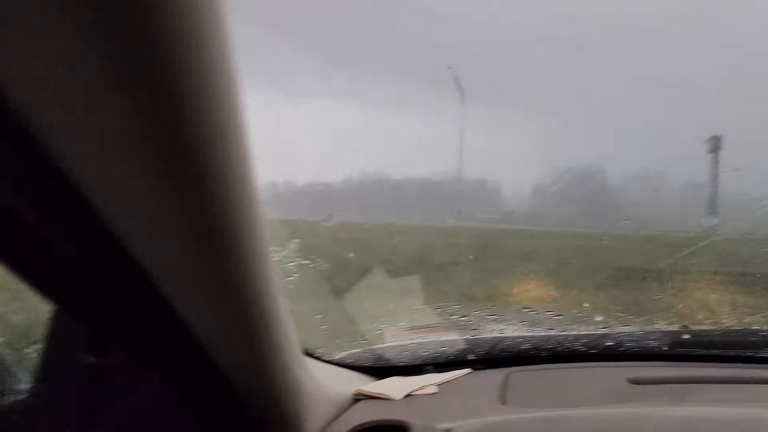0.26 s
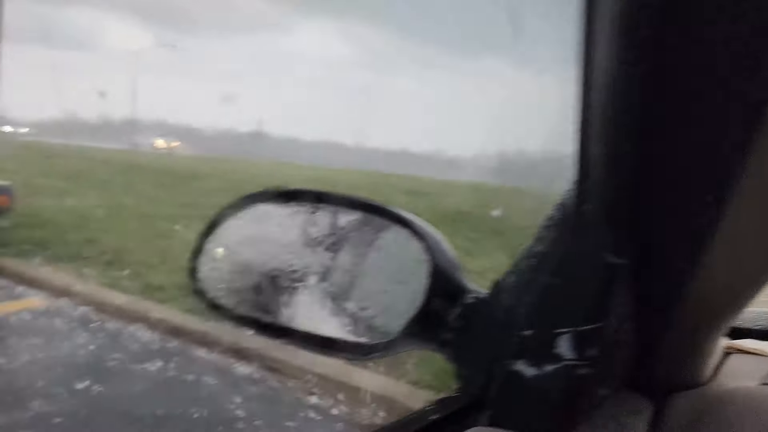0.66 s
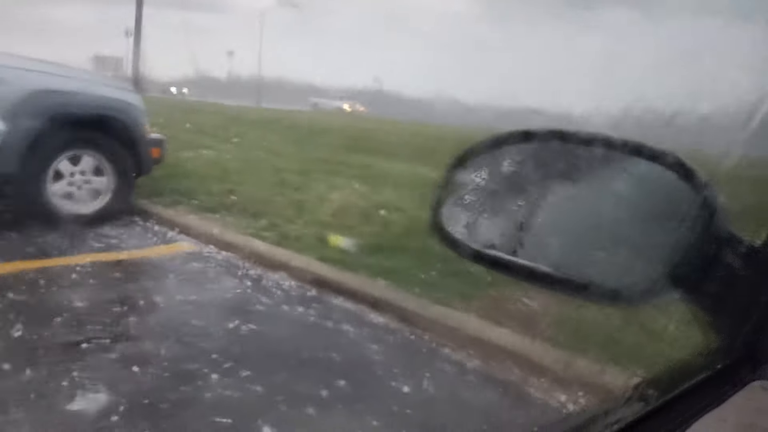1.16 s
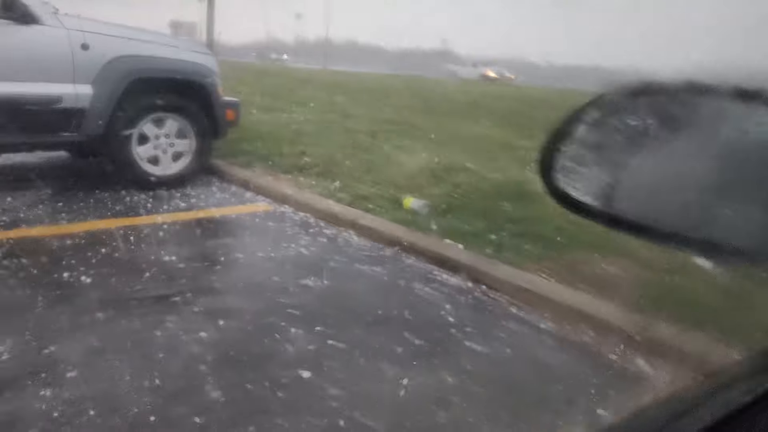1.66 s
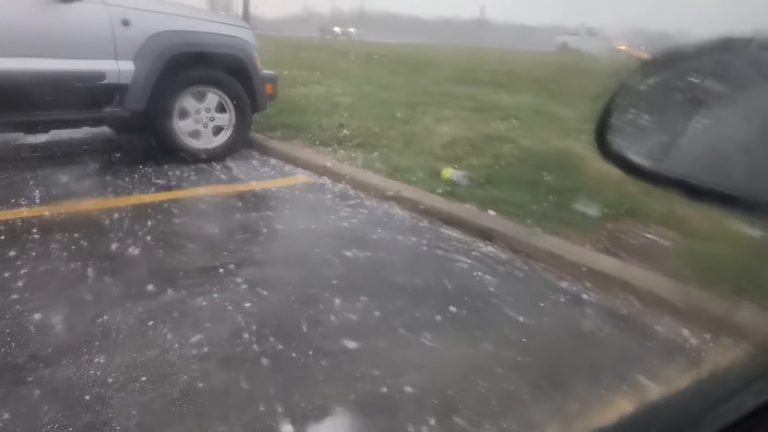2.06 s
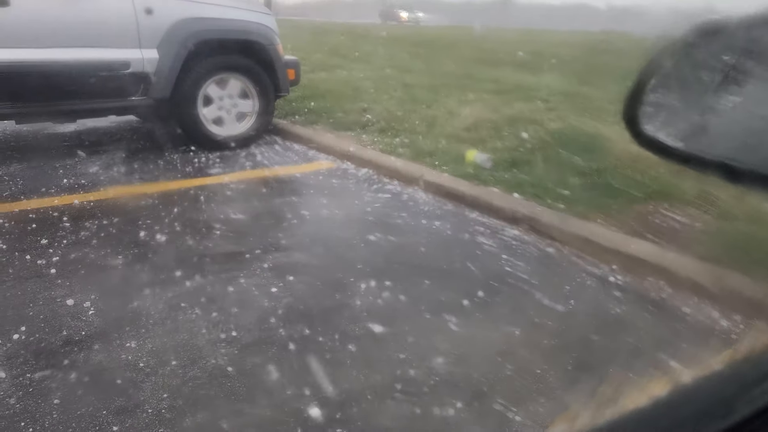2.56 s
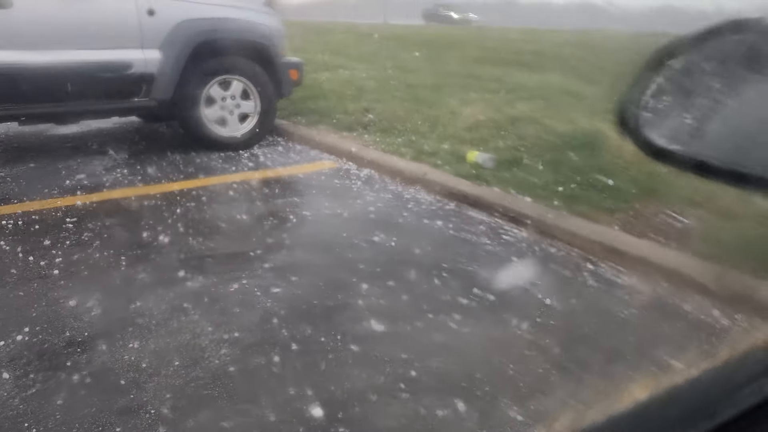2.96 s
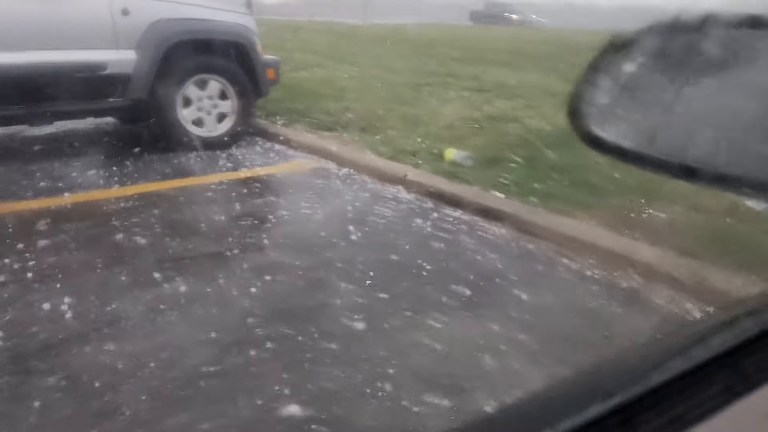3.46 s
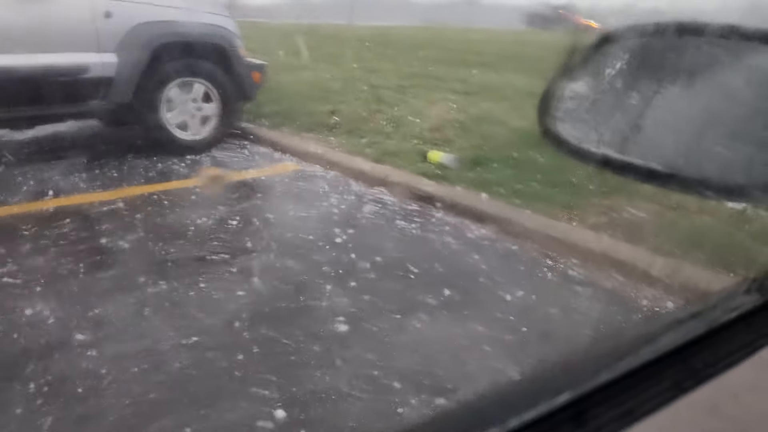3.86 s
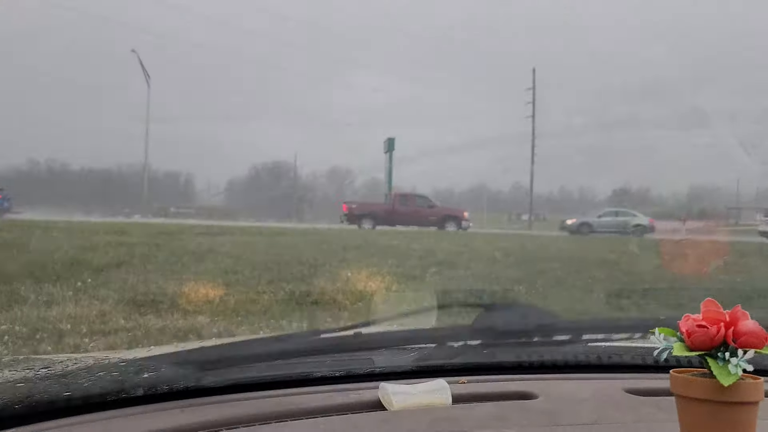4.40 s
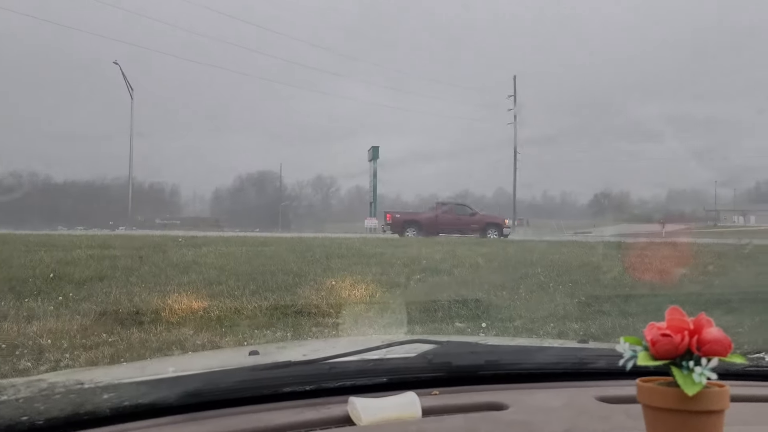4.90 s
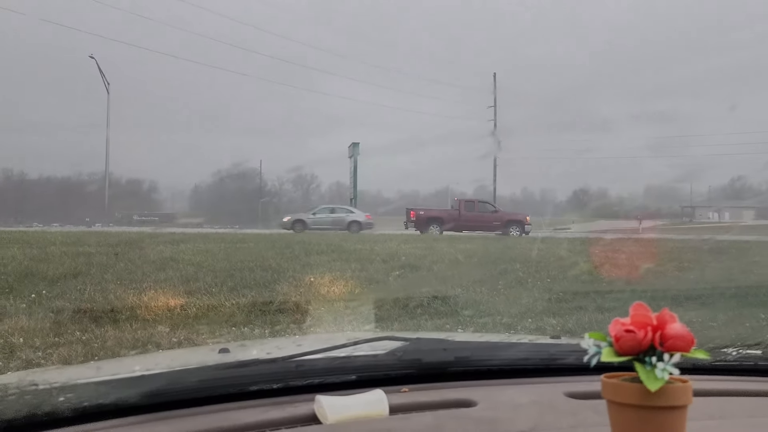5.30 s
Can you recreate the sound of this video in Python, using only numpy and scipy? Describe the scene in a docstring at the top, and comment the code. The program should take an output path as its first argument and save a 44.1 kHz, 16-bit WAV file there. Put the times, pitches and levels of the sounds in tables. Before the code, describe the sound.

Irregular, crowded hail blows on a car body, close and enclosed in the cabin. Each is a short dull thump or tinny knock with crackling ice, some with a deep boom. Hard pounding, a short lull after three seconds, more pounding, an abrupt silent gap past four, another hard burst, then lighter taps over quiet rain and rumble, in dry phone stereo.

```python
"""Hailstones strike the roof, glass and bonnet of a parked car, heard by a stereo phone in the cabin.
Each stone rings the body panels as damped modes, the deepest swelling late, and cracks as noise bursts
of shattering ice; small stones, rain patter and rumble run underneath. Blows fall hard up to 2.9 s,
mostly weaker until 3.3 s, then hard again; the sound is cut to silence at 4.33 s and is back at 4.52 s,
with weaker blows again after 5.06 s."""
import sys
import numpy as np
from scipy import signal
from scipy.fft import rfft, irfft, next_fast_len
from scipy.io import wavfile
from scipy.ndimage import uniform_filter1d

SR = 44100
rng = np.random.default_rng(int(sys.argv[2]) if len(sys.argv) > 2 else 0)


def materialize(psi):
    """Save the field psi as 16-bit PCM at rate SR to the path in sys.argv[1].

    A 1-D psi becomes a single channel; in a 2-D psi each row is a channel.
    """
    bounded = np.clip(np.atleast_2d(psi).T, -1, 1)
    quanta = np.round(bounded * 32767).astype(np.int16)
    wavfile.write(sys.argv[1], SR, quanta)


N = 244314

# stones heard one by one; levels after the blow are relative to it, all before the layer trims:
# (time [s], blow [dB], drum [Hz], drum [dB], knock [Hz], knock [dB], rap [dB], dull crack [dB],
#  bright crack [dB], ring length [1 = usual])
LARGE_STONES = [(0.058, -20, 150, -1, 592, -8, -21, -15, -28, 0.5),
                (0.089, -26, 193, -2, 559, -15, -12, -9, -9, 0.4),
                (0.124, -43, 263, 0, 511, -12, -15, -15, -13, 1.1),
                (0.175, -11, 199, -4, 532, -6, -7, -25, -18, 0.85),
                (0.258, -29, 188, -6, 1464, -8, -4, -7, -12, 0.9),
                (0.28, -19, 199, -1, 1222, -7, -22, -33, -26, 0.9),
                (0.306, -21, 226, -8, 1200, -1, -10, -21, -17, 0.7),
                (0.344, -30, 150, -1, 473, -7, -22, -35, -23, 1.3),
                (0.398, -23, 425, -3, 861, -5, -12, -15, -21, 0.9),
                (0.426, -21, 172, -3, 473, -15, -8, -7, -12, 1.0),
                (0.51, -24, 150, -5, 672, -3, -16, -15, -18, 0.7),
                (0.558, -27, 409, -1, 500, -12, -31, -45, -45, 1.7),
                (0.614, -21, 340, -3, 484, -5, -21, -14, -14, 1.3),
                (0.714, -29, 188, 0, 473, -15, -28, -29, -26, 1.0),
                (0.811, -18, 236, -9, 554, -14, -9, -2, -8, 1.3),
                (0.851, -13, 161, -7, 581, -11, -6, -5, -11, 0.4),
                (0.903, -20, 166, -4, 1485, -7, -5, -13, -12, 0.9),
                (0.991, -10, 382, -6, 520, -2, -7, -28, -24, 0.9),
                (1.071, -10, 188, -3, 1152, -4, -13, -21, -18, 0.6),
                (1.125, -21, 339, -11, 629, -4, -5, -17, -9, 1.2),
                (1.222, -30, 177, -3, 473, -14, -14, -7, -6, 0.7),
                (1.279, -25, 247, -1, 527, -6, -13, -15, -13, 0.8),
                (1.321, -11, 188, -1, 624, -8, -21, -33, -30, 0.7),
                (1.368, -12, 215, -6, 608, -3, -10, -11, -22, 0.9),
                (1.39, -20, 177, -9, 484, -12, -15, -7, -3, 0.6),
                (1.426, -22, 199, -9, 1388, -5, -3, -19, -12, 0.9),
                (1.485, -20, 166, -10, 608, -6, -9, -13, -5, 1.0),
                (1.576, -12, 215, -2, 473, -7, -13, -22, -22, 0.9),
                (1.599, -18, 215, -1, 473, -11, -17, -13, -17, 0.9),
                (1.637, -29, 258, -3, 559, -15, -6, -17, -10, 0.9),
                (1.664, -25, 226, -5, 570, -2, -10, -15, -12, 0.9),
                (1.711, -24, 188, -4, 473, -4, -17, -13, -15, 0.9),
                (1.726, -23, 193, -2, 527, -7, -15, -28, -33, 0.6),
                (1.782, -32, 172, 0, 522, -13, -17, -20, -18, 1.3),
                (1.821, -32, 279, -6, 489, -1, -23, -29, -31, 0.9),
                (1.888, -12, 161, -6, 506, -7, -10, -4, -11, 0.7),
                (1.918, -17, 371, -6, 1496, -3, -8, -17, -17, 0.8),
                (1.99, -25, 446, -6, 678, -2, -8, -22, -20, 1.3),
                (2.024, -17, 441, -7, 602, -1, -25, -16, -28, 0.4),
                (2.064, -27, 226, -6, 543, -10, -7, -6, -6, 1.3),
                (2.096, -9, 349, -2, 1189, -6, -11, -17, -18, 0.6),
                (2.143, -14, 366, -9, 726, -6, -8, -8, -4, 0.9),
                (2.167, -15, 199, -2, 549, -6, -20, -27, -14, 0.9),
                (2.211, -28, 247, -2, 516, -6, -13, -16, -12, 1.0),
                (2.275, -12, 177, -5, 753, -11, -5, -10, -5, 0.9),
                (2.297, -18, 150, -5, 570, -7, -11, -6, -12, 0.6),
                (2.33, -17, 285, -6, 543, -4, -15, -8, -7, 1.3),
                (2.372, -22, 322, -2, 473, -5, -13, -20, -14, 1.3),
                (2.403, -16, 312, -14, 570, -2, -9, -15, -14, 0.4),
                (2.569, -12, 193, -2, 1000, -8, -10, -12, -11, 0.9),
                (2.581, -14, 188, -12, 538, -1, -14, -24, -29, 0.9),
                (2.604, -23, 349, -4, 543, -3, -18, -28, -14, 0.8),
                (2.661, -18, 188, -1, 586, -15, -10, -19, -17, 0.6),
                (2.702, -29, 150, -2, 651, -7, -13, -18, -13, 0.9),
                (2.715, -24, 371, -2, 506, -6, -12, -15, -21, 0.9),
                (2.739, -10, 253, -2, 737, -6, -17, -14, -15, 0.7),
                (2.812, -15, 441, -8, 473, -10, -7, -7, -4, 0.5),
                (2.844, -30, 150, -2, 1291, -9, -8, -18, -14, 0.8),
                (2.904, -31, 231, 0, 473, -19, -14, -20, -20, 0.9),
                (2.918, -37, 183, -8, 473, -3, -16, -5, -31, 0.5),
                (2.955, -43, 177, 0, 656, -15, -24, -22, -18, 0.9),
                (2.976, -37, 156, -4, 473, -4, -13, -10, -11, 1.0),
                (3.041, -36, 285, -5, 645, -7, -12, -15, -3, 0.6),
                (3.08, -22, 150, -5, 565, -12, -13, -11, -4, 0.4),
                (3.12, -31, 242, -4, 1227, -7, -5, -16, -19, 1.3),
                (3.149, -31, 236, -4, 522, -6, -8, -11, -11, 0.9),
                (3.215, -40, 150, -4, 1496, -15, -3, -13, -14, 0.9),
                (3.233, -39, 150, -11, 506, -2, -5, -15, -24, 0.9),
                (3.287, -36, 199, -8, 473, -4, -17, -5, -8, 0.7),
                (3.323, -24, 177, -8, 565, -8, -7, -5, -9, 0.7),
                (3.361, -18, 209, -1, 1211, -8, -18, -18, -17, 0.9),
                (3.444, -36, 242, 0, 1254, -19, -20, -18, -19, 0.9),
                (3.468, -21, 150, -8, 613, -7, -9, -5, -9, 0.9),
                (3.484, -19, 360, -4, 511, -5, -14, -5, -12, 0.9),
                (3.512, -33, 414, -5, 554, -6, -13, -4, -16, 1.0),
                (3.558, -40, 199, -3, 581, -13, -15, -14, -5, 0.9),
                (3.583, -18, 150, -4, 608, -3, -19, -19, -37, 0.4),
                (3.617, -13, 290, -19, 1248, -9, -6, -1, -26, 0.4),
                (3.655, -18, 183, -6, 1114, -8, -6, -7, -12, 0.9),
                (3.67, -19, 215, -8, 893, -4, -8, -7, -8, 1.3),
                (3.775, -24, 296, -6, 522, -2, -16, -21, -18, 1.3),
                (3.83, -18, 150, -16, 570, -7, -12, -3, -9, 0.5),
                (3.895, -31, 231, -1, 662, -8, -13, -18, -16, 0.9),
                (3.912, -14, 172, -7, 1378, -15, -10, -6, -4, 0.6),
                (4.002, -22, 161, -4, 586, -4, -14, -7, -15, 0.9),
                (4.028, -16, 166, -5, 1087, -7, -9, -10, -8, 1.1),
                (4.075, -19, 183, -6, 678, -10, -12, -2, -11, 0.6),
                (4.105, -30, 204, -2, 506, -5, -25, -33, -43, 0.7),
                (4.214, -24, 188, -4, 516, -4, -7, -20, -27, 1.0),
                (4.295, -32, 183, 0, 538, -11, -30, -29, -31, 1.3),
                (4.331, -30, 446, -13, 635, -3, -10, -6, -9, 0.4),
                (4.565, -11, 150, -11, 1114, -5, -8, -4, -14, 0.5),
                (4.635, -27, 312, -7, 1308, -2, -9, -21, -29, 1.3),
                (4.668, -9, 414, -7, 900, -6, -5, -15, -16, 0.8),
                (4.713, -24, 296, -6, 473, -4, -8, -11, -20, 0.8),
                (4.803, -11, 177, -6, 586, -5, -9, -13, -17, 0.8),
                (4.847, -28, 166, -2, 543, -10, -14, -7, -7, 1.1),
                (4.909, -33, 430, -6, 769, -2, -10, -26, -20, 1.3),
                (4.945, -23, 333, -6, 629, -8, -5, -7, -10, 1.5),
                (4.973, -21, 446, -16, 597, -1, -10, -11, -13, 1.1),
                (5.01, -12, 269, -10, 1388, -9, -11, -4, -13, 1.0),
                (5.062, -30, 290, -11, 1248, -6, -3, -16, -9, 0.9),
                (5.099, -41, 236, -10, 947, -8, -3, -6, -11, 1.1),
                (5.144, -43, 188, -5, 1469, -3, -8, -23, -24, 1.3),
                (5.203, -36, 425, -12, 1496, -2, -7, -27, -40, 1.1),
                (5.255, -30, 188, -4, 629, -6, -13, -7, -26, 1.3),
                (5.284, -36, 193, 0, 489, -13, -16, -21, -17, 1.3),
                (5.376, -35, 166, -14, 1318, -1, -9, -24, -47, 1.1),
                (5.452, -37, 150, -3, 855, -5, -10, -19, -26, 1.3),
                (5.523, -40, 150, -14, 554, -1, -7, -20, -30, 0.9)]
# storm strength before the layer trims; hail density moves patter and small stones together:
# (time [s], rumble [dB], hail density [dB])
STORM_LEVELS = [(0, -38, -41), (.3, -30, -38), (.7, -33, -41), (1, -34, -37), (1.23, -36, -43),
                (1.5, -35, -36), (1.85, -34, -39), (2.2, -30, -35), (2.5, -35, -41), (2.8, -31, -38),
                (3.1, -36, -42), (3.5, -32, -39), (4.2, -28, -39), (4.55, -34, -33), (5.15, -34, -40),
                (5.54, -31, -40)]


def undb(db):
    """Amplitude ratio of a level in dB."""
    return 10 ** (np.asarray(db) / 20)


def unit(x):
    """Scale to rms 1."""
    return x / np.sqrt(np.mean(x ** 2))


def over_hz(table, hz):
    """Read a (Hz, value) table on a log axis."""
    table_hz, value = np.transpose(table)
    return np.interp(np.log(hz + 1), np.log(table_hz), value)


def pair(hz, a, b):
    """Left and right from two unrelated draws, as alike and as balanced as the two microphones at this pitch."""
    # (frequency [Hz], left-right correlation [-1..1])
    likeness = [(60, .996), (130, .992), (290, .91), (640, .3), (1200, -.05), (3000, .02)]
    # (frequency [Hz], left minus right [dB])
    balance = [(60, .2), (130, .6), (250, 2), (500, 3.5), (2000, 1.2), (8000, 3.2), (14000, 1.5)]
    correlation = np.clip(over_hz(likeness, hz), -1, 1)
    lean = undb(over_hz(balance, hz) / 2)
    common = np.sqrt(1 + correlation) * a
    opposed = np.sqrt(1 - correlation) * b
    return np.array([lean * (common + opposed), (common - opposed) / lean]) / np.sqrt(2)


def hiss(gain):
    """Stereo noise coloured by gain(Hz), rms 1."""
    size = next_fast_len(N + 1, True)
    hz = np.fft.rfftfreq(size, 1 / SR)
    a, b = rfft(rng.standard_normal((2, size)))
    return unit(irfft(pair(hz, a, b) * gain(hz), size)[:, :N])


def walk(rate_hz):
    """Random levels held 1 / rate_hz s and slewed."""
    hold = int(SR / rate_hz)
    steps = np.repeat(rng.standard_normal(N // hold + 1), hold)
    return uniform_filter1d(steps, hold)[:N]


def hail(s, blow_db, drum_hz, drum, knock_hz, knock, rap, dull, bright, ring):
    """Panels ring and ice breaks for every stone."""
    # stones that shake the cabin into a deep boom, before the mode trims: (time [s], boom [dB])
    booms = [(.058, -26), (.307, -31), (.425, -32), (.572, -33), (.715, -32), (1.889, -34), (2.144, -31),
             (2.167, -28), (2.276, -23), (2.331, -30), (2.703, -29), (2.812, -19), (3.081, -33),
             (3.469, -31), (3.583, -26), (3.776, -31), (3.831, -25), (3.913, -29), (4.077, -29),
             (4.213, -27), (4.566, -30), (4.804, -31), (5.011, -33), (5.1, -33), (5.203, -33), (5.255, -32),
             (5.376, -31), (5.452, -29), (5.523, -33)]
    # stones that splinter more or less than usual: (time [s], splinter over bright crack [dB])
    splinters = [(.851, -3), (1.071, -3), (1.125, 0), (1.368, -3), (1.485, -11), (1.888, -8), (2.143, -9),
                 (3.08, 3), (3.617, 8), (3.83, -10), (3.912, -3), (4.028, -9), (4.668, -3), (4.803, -18),
                 (5.01, -7)]
    # noise bursts, times before the per-stone stretch:
    # (low [Hz], high [Hz], level [dB], t60 [s], tail t60 [s], tail [dB], rise [s])
    thud_band = (400, 1250, -4, .085, .25, -8.5, .0012)
    rap_band = (1300, 2300, -1.5, .07, .24, -8, .0015)
    dull_band = (2500, 5000, 2.5, .06, .18, -11.5, .0016)
    bright_band = (5000, 8300, .5, .06, .18, -11.5, .0023)
    splinter_band = (8300, 16000, 1, .065, .18, -11.5, .003)

    ring = np.clip(ring, .25, 1.8)
    large_s = s[:len(LARGE_STONES)]
    splinter = bright - 5.5  # usual dB over the bright crack
    for at_s, db in splinters:
        k = np.argmin(abs(large_s - at_s))
        splinter[k] = bright[k] + db
    boom_db = np.minimum(-38 + .2 * blow_db, blow_db)  # faint boom of any other stone
    for at_s, db in booms:
        boom_db[np.argmin(abs(large_s - at_s))] = db
    # blows muffled by the roof lining have little crack and spread in time
    soft = np.clip(.75 - .04 * np.maximum(dull, bright), .5, 3)
    body = panels(s, boom_db, drum_hz, blow_db + drum, knock_hz, blow_db + knock, blow_db + rap, ring, soft)
    layers = [(knock, thud_band, ring), (rap, rap_band, ring), (dull, dull_band, ring ** .5),
              (bright, bright_band, ring ** .5), (splinter, splinter_band, ring ** .5)]
    return body + sum(bursts(s, blow_db + db, soft * stretch, band) for db, band, stretch in layers)


def panels(s, boom_db, drum_hz, drum_db, knock_hz, knock_db, rap_db, ring, soft):
    """Damped modes; each blow wakes those nearest the struck spot most, with phases and sizes of its own."""
    # body panel modes before detuning and per-stone damping: (frequency [Hz], level [dB], t60 [s])
    modes = [(70.4, -7, .3), (88.41, 3, .3), (120.18, -2, .25), (160.54, 1, .22), (188.9, 3.5, .22),
             (205.14, -1, .2), (239.22, 2, .22), (261.78, 2.5, .22), (310, 2.5, .2), (338, 2.5, .22),
             (366, 2.5, .2), (410, 3, .2), (465, 3, .2), (520, 3.5, .22), (570, 3, .2), (630, 2.5, .19),
             (730, 1.5, .18), (800, 1.5, .17), (900, 1.5, .2), (1020, 0, .16), (1140, 0, .16),
             (1250, 0, .17), (1360, 0, .2), (1500, -0.5, .16), (1590, -1.5, .13), (1660, -1.5, .1),
             (1740, -1.5, .11), (1890, 0, .09), (1970, 0, .1), (2085, -1, .1), (2155, -2, .11),
             (2375, -3, .1), (2700, -5, .08)]
    boom_top_hz, drum_top_hz, knock_top_hz = 140, 450, 1300
    reach = .24  # half width of the struck spot in log Hz
    late_cycles, boom_late_cycles = .25, 2.1
    detune, luck_db, variants = .035, 2., 12
    soft_rise_s = .0005  # times soft squared: how slowly a muffled blow loads the panel

    hz, db, t60 = np.transpose(modes)
    t = np.arange(SR // 4) / SR
    boom = hz < boom_top_hz
    # bending waves and cabin air bring the modes in late, the cabin boom only after a few cycles
    late = np.where(boom, boom_late_cycles, late_cycles)[:, None]
    swell = (1 - np.exp(-np.outer(hz, t) / late)) ** 2
    shape = swell * np.exp(-np.log(1000) * t / t60[:, None])
    # roof, bonnet, doors and panes ring at slightly different pitches
    detuned_hz = hz * (1 + detune * rng.standard_normal((variants, len(hz))))
    turns = 2 * np.pi * detuned_hz[:, :, None] * t
    rings = np.concatenate([shape * np.sin(turns), shape * np.cos(turns)], axis=1)

    luck = rng.standard_normal((len(s), 3 * len(hz))).reshape(len(s), 3, -1)
    # the modes start nearly in step: one punch, then they drift apart
    phase = -np.exp(1j * luck[:, :2] * [[.7], [4]])
    size = undb(db + luck_db * luck[:, 2])
    out = np.zeros((2, N + len(t)))
    deep = np.tile(boom, 2)  # sine and cosine halves
    for k, i in enumerate((s * SR).astype(int)):
        drum = undb(drum_db[k] + .4) / (1 + (np.log(hz / drum_hz[k]) / reach) ** 2)
        knock = undb(knock_db[k] - 3.5) / (1 + (np.log(hz / knock_hz[k]) / (1.4 * reach)) ** 2)
        spot = np.where(hz < drum_top_hz, drum, knock)
        spot = np.where(boom, undb(boom_db[k] + 6.5), spot)
        spot = np.where(hz > knock_top_hz, undb(rap_db[k] - 7), spot)
        gain = pair(hz, *phase[k]) * spot * size[k]
        gain = np.hstack([gain.real, gain.imag])
        # some spots are braced and stop short
        damp = np.exp(-np.log(1000) * t * (1 / ring[k] - 1) / np.median(t60))
        damp = damp * (1 - np.exp(-t / (soft_rise_s * soft[k] ** 2)))
        waves = rings[k % variants]
        out[:, i:i + len(t)] += gain[:, deep] @ waves[deep] + damp * (gain[:, ~deep] @ waves[~deep])
    return out[:, :N]


def bursts(s, db, soft, band):
    """Ragged noise soaked up by the cabin trim: held by first echoes, quick fall, slower tail; soft ones slower."""
    # broad peaks of the ice: (frequency [Hz], width [Hz], level [dB])
    ice_peaks = [(3797, 610, 1), (7640, 700, 2), (9710, 1560, -3), (11900, 1800, -2)]
    lo_hz, hi_hz, band_db, t60, tail_t60, tail_db, rise_s = band
    ragged_db, hold_s = 3.5, .005
    size = 16  # samples per envelope step

    t = np.arange(SR // 6 // size) * size / SR
    tail = undb(2 * tail_db) * np.exp(-np.log(1e6) * t / tail_t60)
    power = np.zeros(N // size + len(t) + 1)
    for i, big, slow in zip((s * SR / size).astype(int), undb(2 * db), soft):
        rise = (1 - np.exp(-t / (rise_s * slow))) ** 2
        fall = np.exp(-np.log(1e6) * np.maximum(t - hold_s * slow, 0) / (t60 * slow))
        power[i:i + len(t)] += big * rise * (fall + tail)

    def colour(hz):
        peaks_db = sum(peak_db / (1 + (2 * (hz - f) / width) ** 2) for f, width, peak_db in ice_peaks)
        low_cut = (1 + (lo_hz / (hz + 1)) ** 8) ** .5
        high_cut = (1 + (hz / hi_hz) ** 10) ** .5
        return undb(peaks_db) / low_cut / high_cut

    noise = hiss(colour)
    swing = np.interp(np.arange(N) / size, np.arange(len(power)), np.sqrt(power))
    return undb(band_db + ragged_db * walk(520)) * swing * noise


def small_hail(count):
    """Rows for many small stones at random spots, in the columns of the large ones."""
    u = rng.random((count, 4)).T
    g = rng.standard_normal((count, 3)).T
    s = (np.arange(count) + u[0]) / count * (N - 1) / SR
    storm_s, _, hail_db = np.transpose(STORM_LEVELS)
    blow_db = np.interp(s, storm_s, hail_db) - 7 + 4.5 * g[1]
    hard = 3.5 * g[0]  # dB; glass hits are brighter, roof hits duller
    drum_hz, drum_db = 200 * 2.2 ** u[1], -8 - .4 * hard
    knock_hz, knock_db = 480 * 2.6 ** u[2], -4 - .2 * hard
    rap_db, dull_db, bright_db = -7 + 3 * g[2], -18 + hard, -22 + hard
    ring = .6 + .8 * u[3]
    return [s, blow_db, drum_hz, drum_db, knock_hz, knock_db, rap_db, dull_db, bright_db, ring]


def rain():
    """Storm rumble on the body and rain patter: two bands of coloured noise, each wavering alone."""
    # relative spectrum: (frequency [Hz], density [dB per Hz])
    spectrum = [(15, -37), (28, -5), (45, -5), (92, -2), (180, -6), (400, -14), (600, -17), (960, -21),
                (1800, -18), (2500, -29), (4700, -29.5), (9500, -39.5), (16000, -48)]
    split_hz = 700

    def colour(hz):
        return undb(over_hz(spectrum, hz))

    s, rumble_db, hail_db = np.transpose(STORM_LEVELS)
    t = np.arange(N) / SR
    rumble = hiss(lambda hz: colour(hz) * (hz < split_hz))
    rumble = rumble * undb(np.interp(t, s, rumble_db - 3.5) + 4 * walk(11))
    patter = hiss(lambda hz: colour(hz) * (hz >= split_hz))
    patter_db = np.interp(t, s, hail_db - 13.5) + 3.5 * walk(40) + 2.5 * walk(170)
    return rumble + patter * undb(patter_db)


def scene():
    """Large and small hail over rain."""
    stones = np.hstack([np.transpose(LARGE_STONES), small_hail(count=230)])
    return hail(*stones) + rain()


def record(dry):
    """The phone rounds the peaks; the sound cuts out sharply and fades back in; the top is cut."""
    # (sound out [s], sound back [s])
    cut = (4.334, 4.52)
    top_hz = 16100
    t = np.arange(N) / SR
    out_s, back_s = cut
    gate_s = [out_s, out_s + .002, back_s - .02, back_s - .002, back_s + .004, back_s + .04]
    gate = np.interp(t, gate_s, [1, 0, 0, .03, .7, 1])
    rounded = np.tanh(.6 * dry) / .6
    low_pass = signal.ellip(8, .2, 60, top_hz, fs=SR, output="sos")
    return signal.sosfilt(low_pass, gate * rounded)


dry = scene()
out = record(dry)
materialize(out)
```